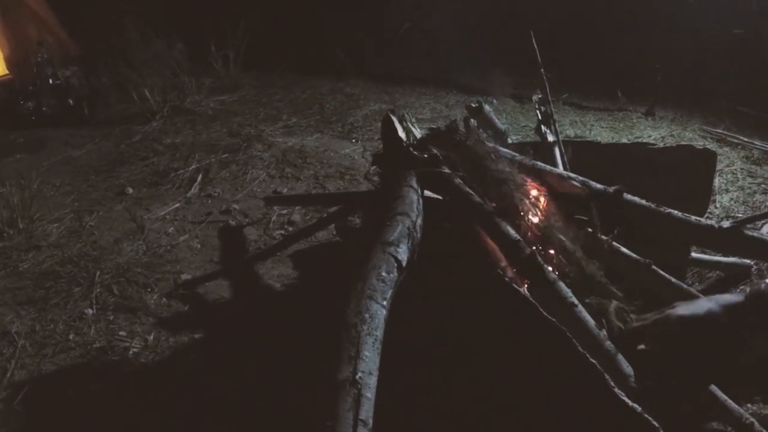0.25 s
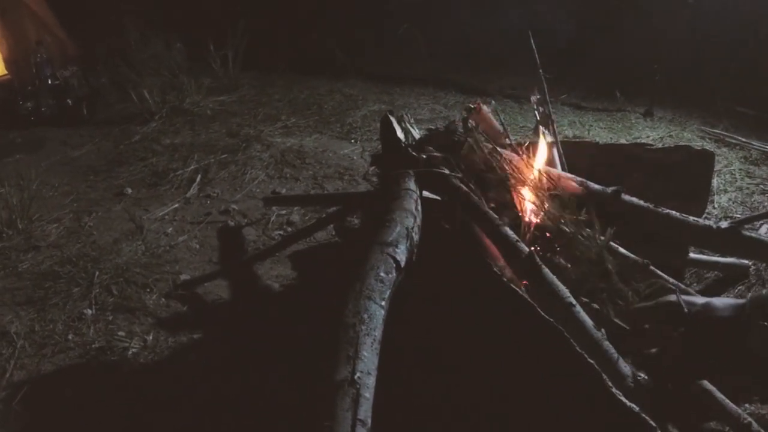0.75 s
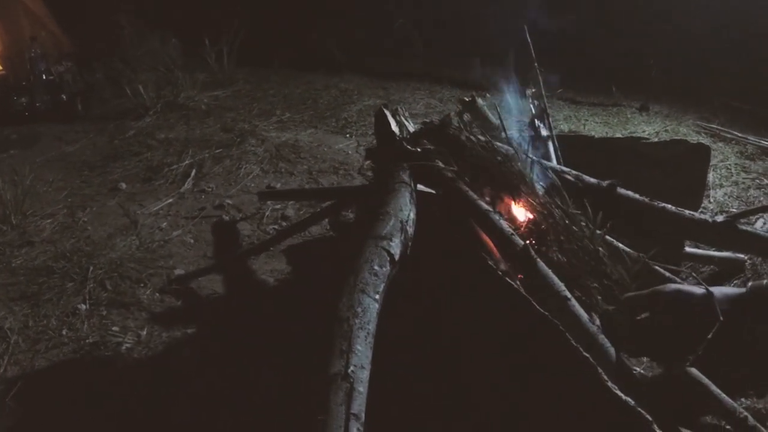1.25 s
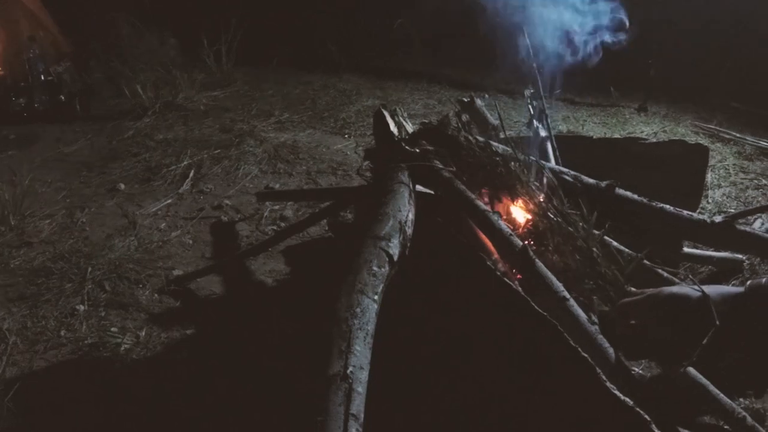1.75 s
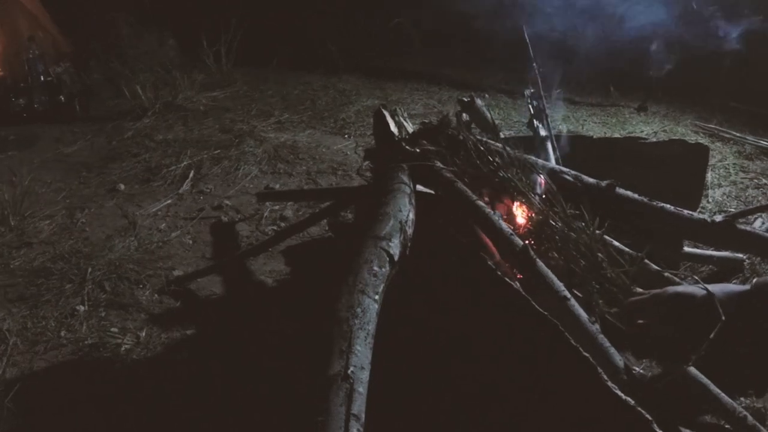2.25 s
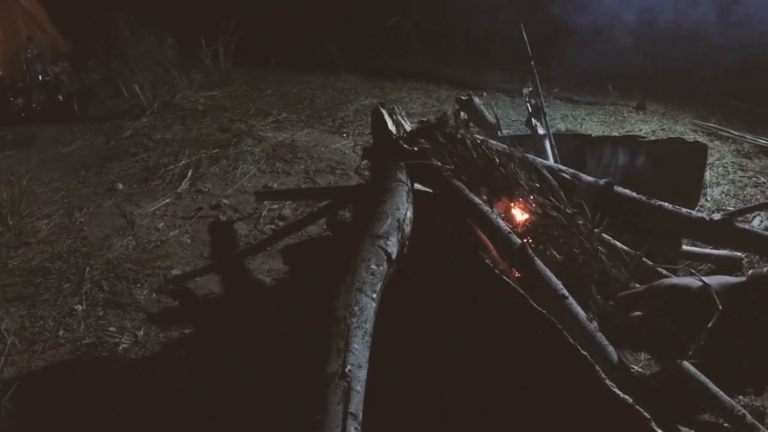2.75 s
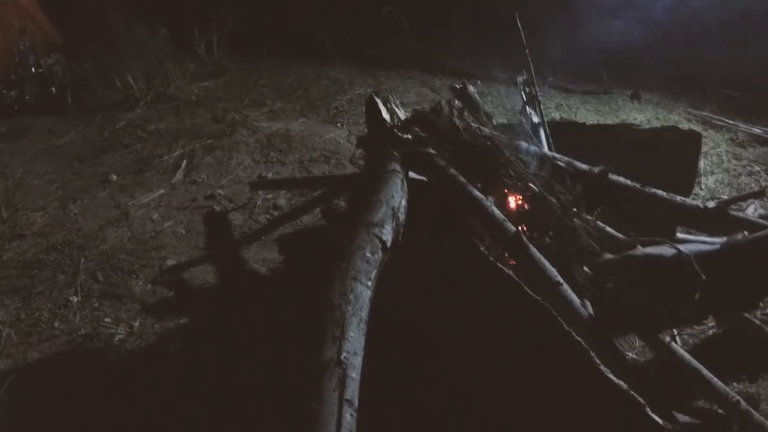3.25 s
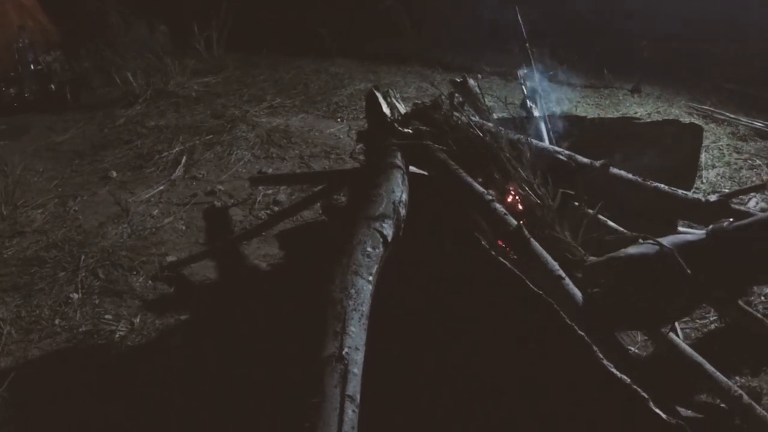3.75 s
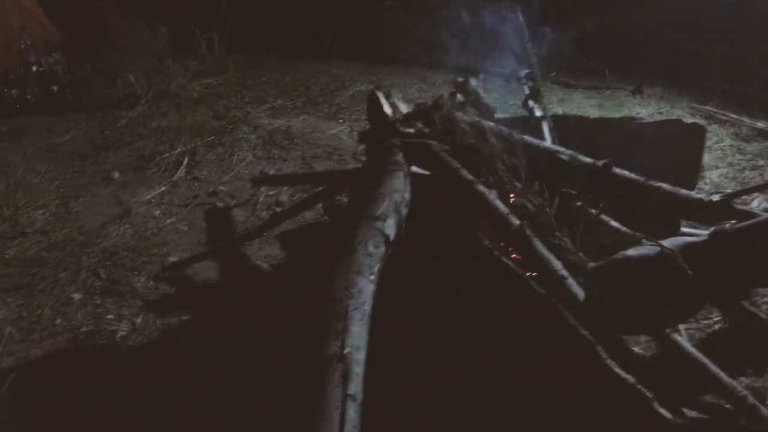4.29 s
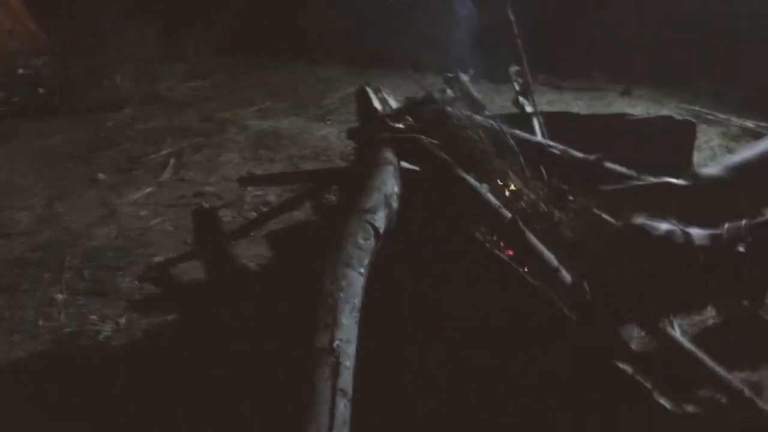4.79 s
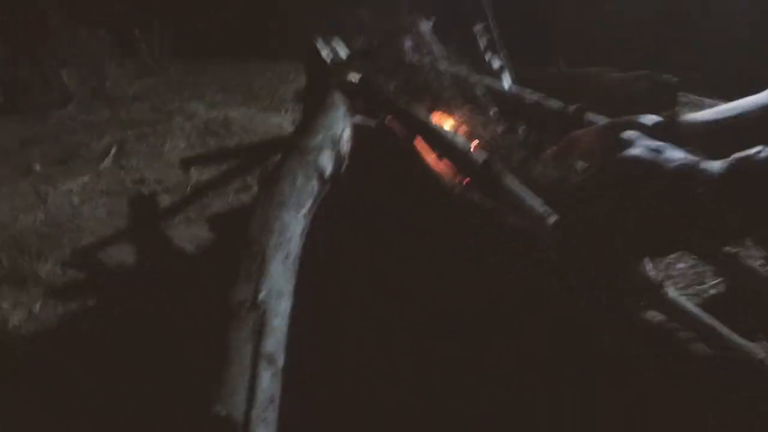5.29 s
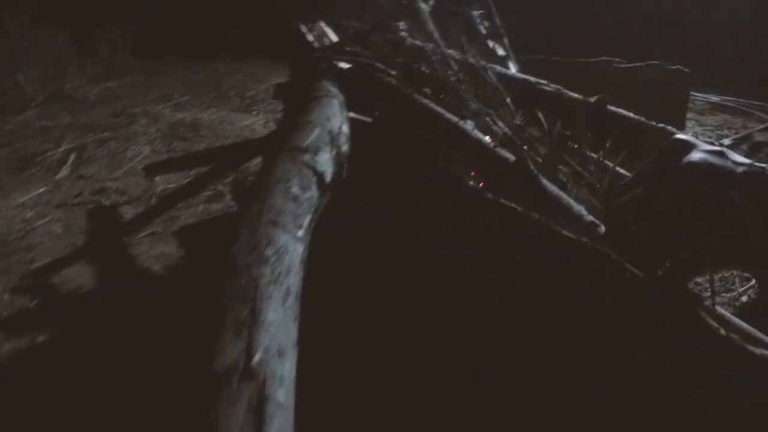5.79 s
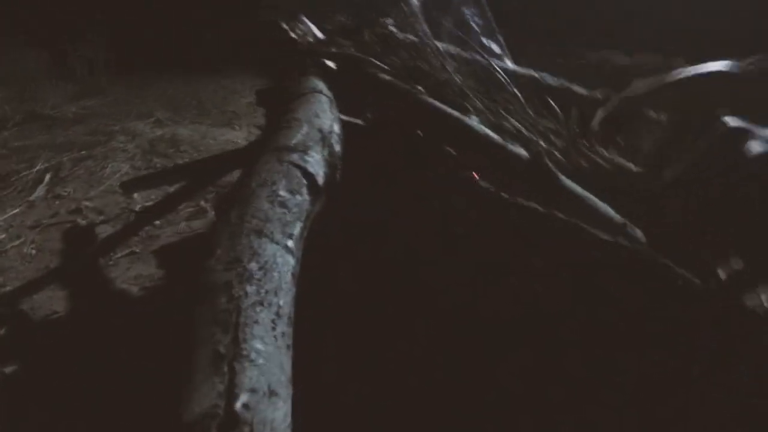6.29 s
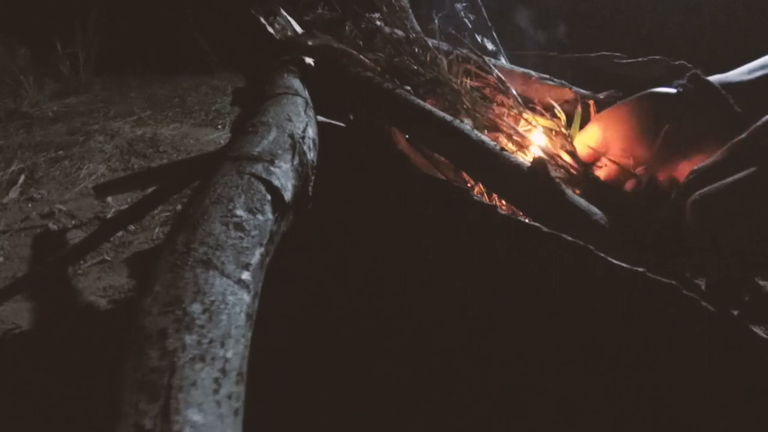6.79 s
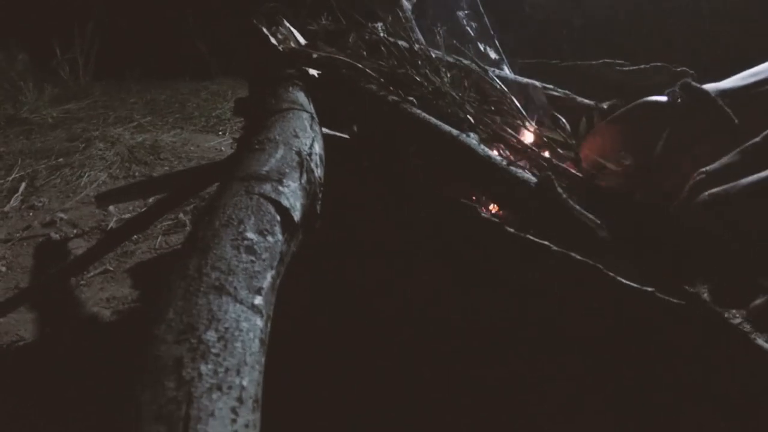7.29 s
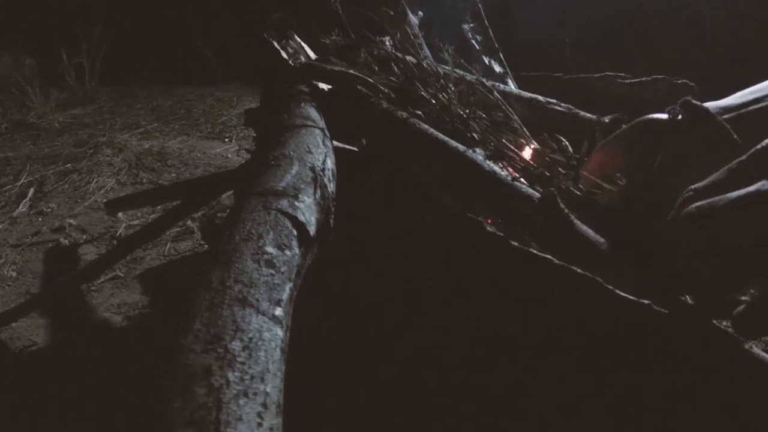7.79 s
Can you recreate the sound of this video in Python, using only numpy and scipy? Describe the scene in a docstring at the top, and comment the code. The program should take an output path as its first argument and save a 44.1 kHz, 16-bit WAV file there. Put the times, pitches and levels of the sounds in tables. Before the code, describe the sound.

Crickets and bush crickets sing quietly throughout in the open night air, with a faint far-off rumble beneath. Midway come close bumps and scrapes of a hand on the microphone, one knock much louder than everything else, along with tiny twig cracks and fabric brushing dry grass. Then a nearby lighter rasps and snaps once, and its gas catches with a soft puff and hiss as the insects carry on.

```python
"""Crickets and bush crickets sing with wing strokes on a lakeside night, over a low, distant rumble.
Halfway through, a hand knocks and rubs the microphone's case, a sleeve swishes over dry grass
and twigs tick. Then a lighter is struck once at the campfire's kindling:
the wheel rasps and snaps, the gas catches with a puff and burns with a faint hiss."""
import sys
import numpy as np
from scipy import signal
from scipy.fft import rfft, irfft, next_fast_len
from scipy.io import wavfile

SR = 44100
rng = np.random.default_rng(int(sys.argv[2]) if len(sys.argv) > 2 else 0)


def store_pcm(level_fs):
    """Save levels as 16-bit WAV."""
    pcm = np.round(np.clip(level_fs, -1, 1) * 32767).astype(np.int16)
    wavfile.write(sys.argv[1], SR, np.atleast_2d(pcm).T)


N = 354563
TIME = np.arange(N) / SR


# Runs of evenly spaced chirps: start_s, period_s
CHIRP_RUNS = [(.041, .206), (.215, .2053), (2.267, .2072), (4.724, .2062), (5.927, .206), (7.963, .206)]
# Chirps with a third syllable: near_time_s
LONG_CHIRPS = [3.92, 4.13, 4.72, 5.14, 6.34, 6.55]

def chirps():
    """Start and syllable count of each chirp; a run beats on until the next takes over."""
    ends_s = [start_s for start_s, _ in CHIRP_RUNS[1:]] + [N / SR + 1]
    for (first_s, period_s), end_s in zip(CHIRP_RUNS, ends_s):
        for start_s in np.arange(first_s, end_s - period_s / 2, period_s):
            is_long = any(abs(start_s - long_s) < period_s / 2 for long_s in LONG_CHIRPS)
            yield start_s, 3 if is_long else 2


def near_cricket(level_db=-49.5, first_db=-3, spacing_s=0.0343, echo_db=-9, far_ear_db=-3):
    """A cricket on the left chirps in two or three falling syllables, the first weaker."""
    song = np.zeros(N)
    for start_s, count in chirps():
        for k in range(count):
            effort_db, detune = rng.normal(0, 0.9), rng.normal(1, 0.007)
            gain = from_db(level_db + first_db * (k == 0) + effort_db)
            add(song, start_s + k * spacing_s, gain * syllable(0.029, 5070 * detune, 3850 * detune))
    direct = np.stack([song, from_db(far_ear_db) * np.roll(song, 7)])
    return direct + from_db(echo_db) * scatter(song, t60_s=0.15)


def syllable(length_s, start_hz, end_hz):
    """One wing stroke: a tone that falls as the wing slows."""
    progress = np.linspace(0, 1, int(length_s * SR))
    pitch_hz = start_hz + (end_hz - start_hz) * progress ** 1.274
    cycles = np.cumsum(pitch_hz) / SR + rng.random()
    return np.sin(np.pi * progress) ** 2 * np.sin(2 * np.pi * cycles)


# Relative insect gains: time_s, high_cricket_db, chorus_db, trill_db, buzz_db
INSECT_GAINS = [(0, -81.5, -64, -91.5, -67), (4.9, -74, -60.5, -84.5, -68.5), (5.3, -57, -59, -79.5, -70),
                (6.3, -60, -60.5, -71, -68.5), (7.0, -58.5, -61.5, -67, -64.5),
                (8.04, -60, -59.5, -66, -62.5)]

def insects():
    """All the singers; four of their levels change as the microphone turns."""
    high_db, chorus_db, trill_db, buzz_db = in_time(INSECT_GAINS)
    far = far_crickets(chorus_db)
    crickets = near_cricket() + high_cricket(high_db + 5)
    return crickets + bush_cricket_trill(trill_db) + bush_cricket_buzz(buzz_db + 5) + far


def high_cricket(level_db, period_s=0.241, echo_db=-9):
    """A second kind keeps strict time with pairs of long, nearly level syllables."""
    song = np.zeros(N)
    for start_s in np.arange(0.18, N / SR, period_s):
        for delay_s in (0, 0.051):
            add(song, start_s + delay_s, syllable(0.044, 7520, 7220))
    song *= from_db(level_db)
    return song * pan(-5) + from_db(echo_db) * scatter(song, t60_s=0.192)


def bush_cricket_trill(level_db, rate_hz=42.8, spacing_s=0.007):
    """Rapid groups of three short, falling pips."""
    trill, start_s = np.zeros(N), 0
    while start_s < N / SR:
        for k, accent_db in enumerate([0, -1, -9]):
            top_hz = rng.normal(8720, 130)
            gain = from_db(rng.normal(accent_db, 1.877))
            add(trill, start_s + k * spacing_s, gain * syllable(0.008, top_hz, top_hz - 900))
        start_s += rng.normal(1, 0.012) / rate_hz
    return from_db(level_db) * rms_one(trill) * pan(-1.189)


def bush_cricket_buzz(level_db, rate_hz=187.5, depth=0.4278):
    """A very high band of noise, pulsing at the wing rate."""
    wing_hz = rate_hz * (1 + 0.006 * drift(3))
    beat = 1 + depth * np.sin(2 * np.pi * np.cumsum(wing_hz) / SR)
    return from_db(level_db) * rms_one(beat) * band(14246, 1200) * pan(3.5)


def far_crickets(gain_db):
    """Three kinds ring in chorus; the farthest singers blur into a hiss."""
    far = from_db(gain_db - 2) * chorus(6900, 520, stroke_hz=50, flutter_db=2)
    far += from_db(gain_db - 3.5) * chorus(7270, 420, stroke_hz=50, flutter_db=2.5)
    far += from_db(-67) * chorus(5110, 406.3, stroke_hz=66, flutter_db=2)
    return far + from_db(-71) * band(4795, 1006) + from_db(-69.5) * band(8000, 800)


def chorus(pitch_hz, width_hz, stroke_hz, flutter_db):
    """Many crickets of one kind merge into a narrow, shimmering band; unit rms."""
    return rms_one(band(pitch_hz, width_hz) * from_db(flutter_db * drift(stroke_hz)))


# Case modes: pitch_hz, gain_db, t60_s
CASE_MODES = [(181.8, -8, 0.0248), (365.4, -2, 0.0079), (580, -0.5, 0.00531), (1048.7, -5.5, 0.010968),
              (1210, -15, 0.017), (2486, -18, 0.02)]
# Finger knocks: start_s, peak_db, lowpass_hz, pan_db
KNOCKS = [(2.608, -43, 800, -6), (4.389, -19.5, 400, -19.5), (4.4002, -15.5, 1400, -23.5),
          (4.409, -12.5, 1600, -18.5), (4.4165, -10, 2000, -24), (4.4236, -6, 326, -40),
          (4.5295, 6, 1330, -19), (5.088, -31, 338, -8.5), (5.107, -29, 633, -21), (5.27, -37, 700, -14.5),
          (5.368, -32.5, 784, -24.5), (5.548, -45.5, 896, -17), (6.23, -40.5, 395.3, -12.5)]

def knocks():
    """A soft fingertip sets the case ringing, close to the right-hand port."""
    out, t = np.zeros((2, N)), TIME[:SR // 8]
    ring = sum(from_db(gain_db - 60 * t / t60_s) * np.sin(2 * np.pi * pitch_hz * t)
               for pitch_hz, gain_db, t60_s in CASE_MODES)
    for start_s, peak_db, lowpass_hz, pan_db in KNOCKS:
        knock = cut(cut(ring, lowpass_hz, "low"), 210, "high")
        add(out, start_s, from_db(peak_db) * knock / np.abs(knock).max() * pan(pan_db))
    return out


# Skin and cloth rubs: peak_s, level_db, rise_s, fall_s, lowpass_hz, pan_db
RUBS = [(4.339, -30, 0.00342, 0.00644, 350, -16), (4.403, -25.5, 0.01584, 0.00704, 1190, -24),
        (4.416, -20.5, 0.00532, 0.00355, 1460, 3.5), (4.4223, -6, 0.0013, 0.0035, 2120, -28),
        (4.434, -17, 0.00097, .003, 2974, -7.5), (4.461, -33, 0.004, 0.017, 200, -20),
        (4.543, -21.5, 0.0078, 0.0022, 1100, -24), (4.563, -33, 0.004, 0.00824, 600, -17),
        (4.679, -34, 0.0009, 0.0064, 1285, 3), (4.706, -46, 0.0182, 0.0221, 1590, -2),
        (4.775, -49.5, 0.038, 0.019, 4060, -17.5), (4.827, -35.5, 0.001654, 0.0085, 3800, 20),
        (4.857, -34, 0.01187, 0.01234, 1680, -4), (6.41, -49, 0.0163, 0.045, 750, -1.5),
        (7.12, -62.5, 0.0231, 0.074, 1410, 1.5)]

def rubs(hiss_db=-17, body_db=5):
    """Skin and cloth slip: a dull scrape coloured by the case, with a thin hiss on top."""
    out = np.zeros((2, N))
    for peak_s, level_db, rise_s, fall_s, lowpass_hz, pan_db in RUBS:
        slips, swell, lead_s = friction(rise_s, fall_s, grain_db=7, spread=0.43)
        hiss = from_db(hiss_db) * cut(slips, 4 * lowpass_hz, "low", order=1)
        scrape = cut(slips, lowpass_hz, "low") + hiss
        body = from_db(body_db) * resonate(scrape, 250, 252.8)
        rub = cut((scrape + body) * swell, 110, "high")
        add(out, peak_s - lead_s, from_db(level_db) * rms_one(rub) * rms(swell) * pan(pan_db))
    return out


# Lighter modes: pitch_hz, width_hz, gain_db
LIGHTER_MODES = [(257, 58, 6), (1250, 434, -11), (2750, 670, 1), (3635, 640, 2), (5430, 980, -4),
                 (8820, 2600, -14.5), (13470, 3700, -11.5)]

def lighter(strike_s=6.684, spin_s=0.0172, rasp_db=-27, snap_db=-11.5):
    """The wheel rasps over the flint, lets go with a snap and lights the gas."""
    wheel, age_s = np.zeros((2, N)), TIME - strike_s
    for level_db, rise_s, fall_s in [(rasp_db, 0.009, 0.004), (snap_db, 0.0005, 0.0013)]:
        slips, swell, lead_s = friction(rise_s, fall_s, grain_db=1, spread=0.35)
        body = sum((-1) ** k * from_db(gain_db) * resonate(slips * swell, pitch_hz, width_hz)
                   for k, (pitch_hz, width_hz, gain_db) in enumerate(LIGHTER_MODES))
        add(wheel, strike_s - lead_s, from_db(level_db) * rms_one(cut(body, 104, "high")) * rms(swell))
    return wheel * (age_s > -spin_s) * pan(3.13) + ignition(age_s)


def ignition(age_s, gas_db=-52, puff_db=-38, puff_delay_s=0.0221, flame_db=-70):
    """Gas escapes, catches with a low puff and burns with a faint, fading hiss."""
    jet = cut(rng.standard_normal((2, N)), 560, "high")
    gas = from_db(gas_db) * np.exp(-np.abs(age_s) / 0.105) * jet
    thump = rms_one(cut(resonate(rng.standard_normal(N), 192, 110), 524, "low"))
    puff = from_db(puff_db) * np.exp(-np.abs(age_s - puff_delay_s) / 0.0093) * thump
    flame = from_db(flame_db) * np.exp(-np.abs(age_s) / 0.74) * band(2680, 1105)
    return puff + (gas + flame) * (age_s > 0)


# Twig cracks: peak_s, peak_db, pitch_hz
TWIG_TICKS = [(3.921, -34.5, 3310), (4.209, -35.5, 4150), (4.521, -35.5, 3000), (4.614, -25.5, 11750),
              (4.6135, -28, 3080), (4.646, -37, 4130), (4.752, -34, 6900), (4.772, -33, 4200),
              (5.487, -42.5, 4900), (7.505, -44, 4550)]

def twig_ticks(width_ratio=0.66):
    """Dry twigs give way in tiny, sharp cracks."""
    out = np.zeros((2, N))
    for peak_s, peak_db, pitch_hz in TWIG_TICKS:
        slips, swell, lead_s = friction(rise_s=0.0001, fall_s=0.00074, grain_db=4, spread=0.665)
        crack = resonate(slips * swell, pitch_hz, width_ratio * pitch_hz, passes=2)
        add(out, peak_s - lead_s, from_db(peak_db) * crack / np.abs(crack).max())
    return out


# Swish spectrum: frequency_hz, density_db
SWISH_SPECTRUM = [(300, -30), (1000, -4.5), (2500, 2.5), (4500, 1.5), (7000, -1.5), (11000, -6), (15000, 4)]
# Sleeve sweeps: peak_s, level_db, rise_s, fall_s
SLEEVE_SWEEPS = [(3.94, -57.5, 0.012, 0.334), (4.44, -56, 0.069, .14), (4.66, -49, 0.089, 0.28),
                 (4.84, -47.5, 0.057, 0.067), (5.15, -58, .1, .25), (5.85, -59, 0.102, .06)]

def sleeve_swish(grain_db=1.5):
    """Fabric slides over dry grass: a bright hiss of countless tiny catches."""
    power = sum((from_db(level_db) * envelope(TIME - peak_s, rise_s, fall_s)) ** 2
                for peak_s, level_db, rise_s, fall_s in SLEEVE_SWEEPS)
    return np.sqrt(power) * from_db(grain_db * drift(300)) * diffuse(SWISH_SPECTRUM)


# Rumble spectrum: frequency_hz, density_db
RUMBLE_SPECTRUM = [(15, -53), (25, -26), (43, -21), (71, -21), (112, -8.5), (130, -6), (142, -2), (203, -5),
                   (256, -0.5), (430, -14.5), (462, -15), (533, -20.5), (685, -23), (1800, -44.5),
                   (2340, -71.5), (3960, -120)]
# Relative rumble gain: time_s, gain_db
RUMBLE_GAIN = [(0.0, -53), (4.05, -53.5), (4.61, -49.5), (5.08, -51), (7.05, -53.5), (7.75, -53.5),
               (8.04, -54.5)]

def distant_rumble(trim_db=1.6738, drone_hz=145, drone_db=-62):
    """Low, far-off noise with one faint, wavering note standing out."""
    gain_db, = in_time(RUMBLE_GAIN)
    rumble = from_db(gain_db + trim_db) * diffuse(RUMBLE_SPECTRUM)
    drone = resonate(rng.standard_normal(N), drone_hz, width_hz=9, passes=2)
    return rumble + from_db(drone_db) * rms_one(drone)


# Air spectrum: frequency_hz, density_db
AIR_SPECTRUM = [(1000, -4), (1900, -3.5), (2450, 5), (3100, 0), (3900, 6), (5000, 3), (5800, -12.5),
                (6600, 8.5), (9000, 1), (11000, -4), (12200, -4.5), (12800, 5.5), (13300, 2), (15000, -3)]

def night_air(level_db=-64):
    """The steady, faint hiss of a still night."""
    return from_db(level_db) * diffuse(AIR_SPECTRUM)


# Left-right likeness of diffuse noise: frequency_hz, correlation
STEREO_CORRELATION = [(30, .1), (150, 0.975), (500, 0.558), (2000, 0.076), (7000, 0.1594), (15000, 0.036)]

def diffuse(spectrum):
    """Stereo noise arriving from all around; unit rms."""
    size = next_fast_len(N)
    hz = np.arange(size // 2 + 1) * SR / size
    mid, side = rfft(rng.standard_normal((2, size))) * from_db(at_hz(spectrum, hz))
    correlation = at_hz(STEREO_CORRELATION, hz)
    stereo = np.sqrt(1 + correlation) * mid + np.sqrt(1 - correlation) * side * [[1], [-1]]
    return rms_one(irfft(stereo, size)[:, :N])


def scatter(x, t60_s):
    """Grass and trees return a diffuse tail, different on each side."""
    t = TIME[:SR // 2]
    tail = rng.standard_normal((2, len(t))) * from_db(-60 * t / t60_s)
    tail /= np.sqrt(np.sum(tail ** 2) / 2)
    return signal.fftconvolve(x[None], tail, axes=1)[:, :N]


def friction(rise_s, fall_s, grain_db, spread):
    """Uneven stereo micro-slips, their envelope and the time to its peak."""
    t = np.arange(-int(5 * rise_s * SR), int(6 * fall_s * SR)) / SR
    noise = rng.standard_normal((2, len(t)))
    mid, side = rms_one(noise * from_db(grain_db * rng.standard_normal(len(t))))
    return mid + spread * side * [[1], [-1]], envelope(t, rise_s, fall_s), -t[0]


def envelope(t, rise_s, fall_s):
    """Exponential rise and fall, peaking at t = 0."""
    return np.exp(np.minimum(t / rise_s, -t / fall_s))


def band(hz, width_hz):
    """Stereo noise in a steep-sided resonance; unit rms."""
    return rms_one(resonate(rng.standard_normal((2, N)), hz, width_hz, passes=3))


def drift(rate_hz):
    """Random wander; unit rms."""
    knots = rng.standard_normal(int(N / SR * rate_hz) + 2)
    return rms_one(np.interp(TIME * rate_hz, np.arange(len(knots)), knots))


def resonate(x, hz, width_hz, passes=1):
    """Resonators in series, unit peak gain."""
    radius = np.exp(-np.pi * width_hz / SR)
    forward = np.array([1, 0, -1]) * (1 - radius ** 2) / 2
    feedback = [1, -2 * radius * np.cos(2 * np.pi * hz / SR), radius ** 2]
    for _ in range(passes):
        x = signal.lfilter(forward, feedback, x)
    return x


def cut(x, hz, kind, order=2):
    """Butterworth low- or high-pass."""
    return signal.sosfilt(signal.butter(order, min(hz, SR / 2 - 1), kind, fs=SR, output="sos"), x)


def in_time(rows):
    """One curve per value column."""
    times_s, *columns = np.transpose(rows)
    return [np.interp(TIME, times_s, column) for column in columns]


def at_hz(points, hz):
    """Interpolate on a log-frequency axis."""
    knots_hz, values = np.transpose(points)
    return np.interp(np.log(hz + 1), np.log(knots_hz), values)


def add(out, start_s, sound):
    """Mix a sound in at start_s."""
    offset = int(round(start_s * SR))
    first, end = max(offset, 0), min(offset + sound.shape[-1], N)
    if end > first:
        out[..., first:end] += sound[..., first - offset:end - offset]


def pan(db):
    """Stereo gains, positive to the left; the louder side stays at one."""
    return from_db([[min(db, 0)], [min(-db, 0)]])


def from_db(db):
    return 10 ** (np.asarray(db) / 20)


def rms(x):
    return np.sqrt(np.mean(x ** 2) + 1e-20)


def rms_one(x):
    return x / rms(x)


def scene():
    """Insects and small close noises over the night background."""
    background = distant_rumble() + night_air()
    return insects() + knocks() + rubs() + sleeve_swish() + twig_ticks() + lighter() + background


def record(dry, ceiling=0.95, cutoff_hz=15100):
    """The hardest knock overloads the input; a steep low-pass cuts the top treble."""
    lowpass = signal.ellip(10, 0.1, 70, cutoff_hz, fs=SR, output="sos")
    return signal.sosfilt(lowpass, np.clip(dry, -ceiling, ceiling))


dry = scene()
out = record(dry)
store_pcm(out)
```